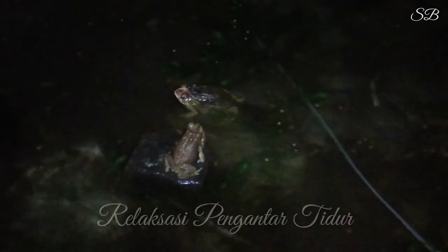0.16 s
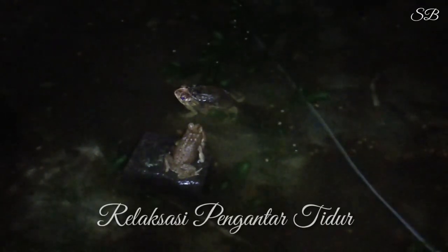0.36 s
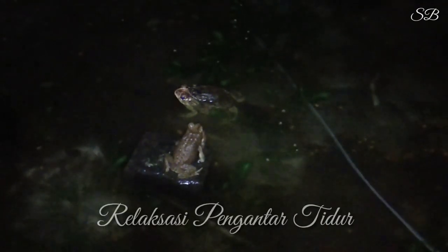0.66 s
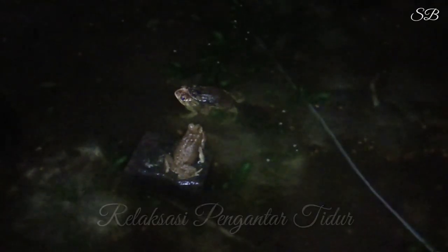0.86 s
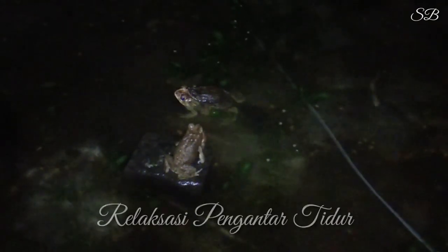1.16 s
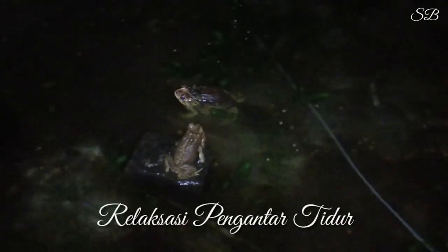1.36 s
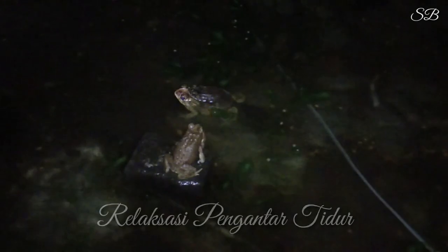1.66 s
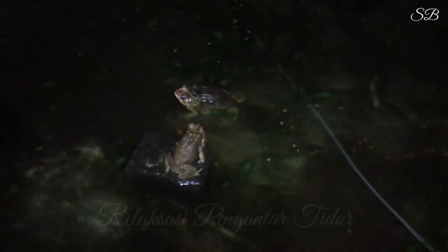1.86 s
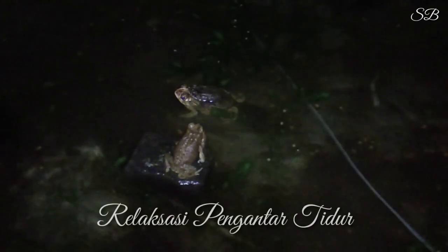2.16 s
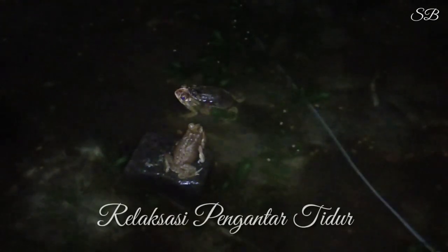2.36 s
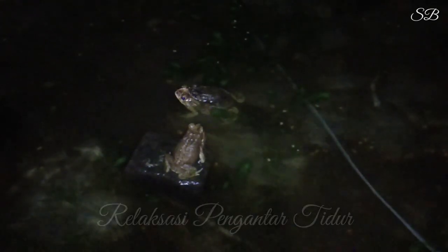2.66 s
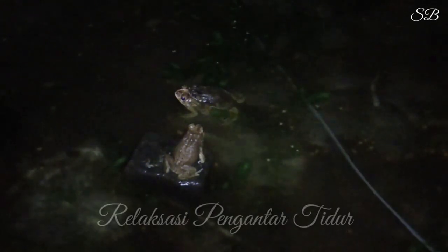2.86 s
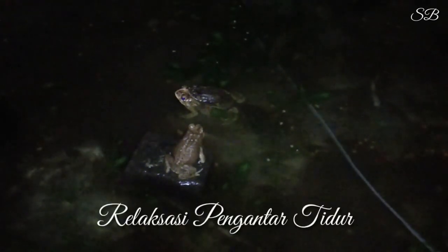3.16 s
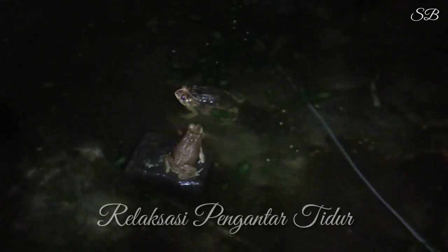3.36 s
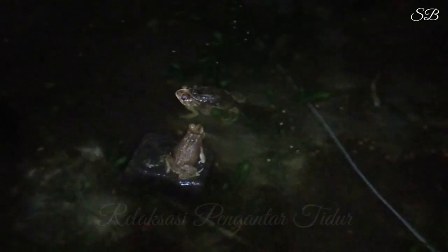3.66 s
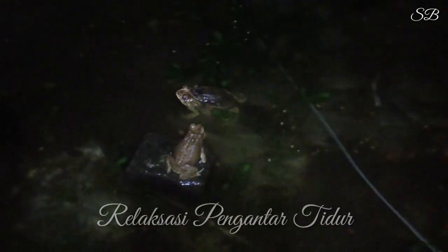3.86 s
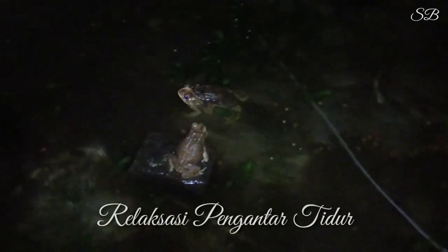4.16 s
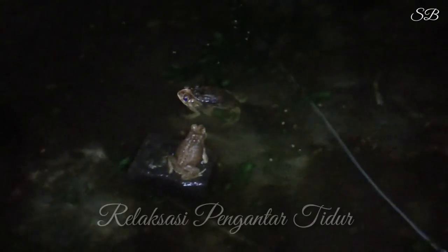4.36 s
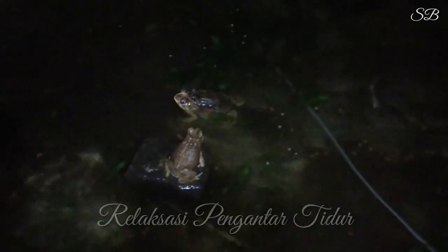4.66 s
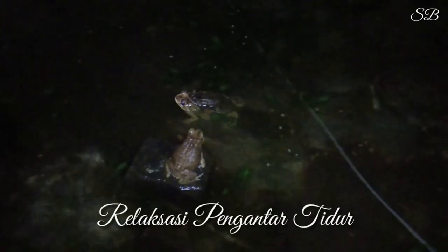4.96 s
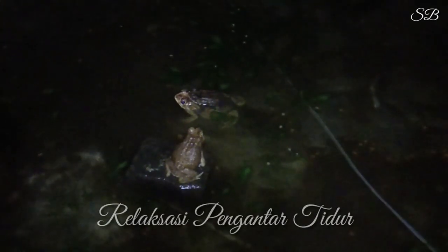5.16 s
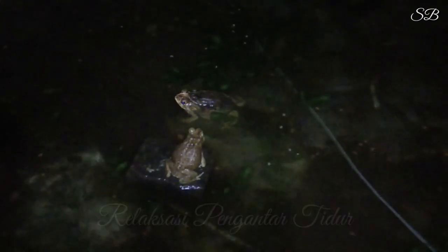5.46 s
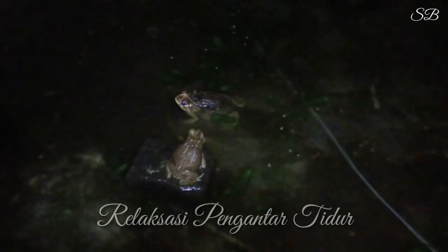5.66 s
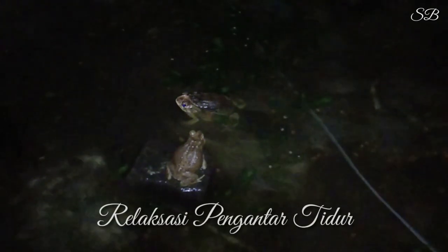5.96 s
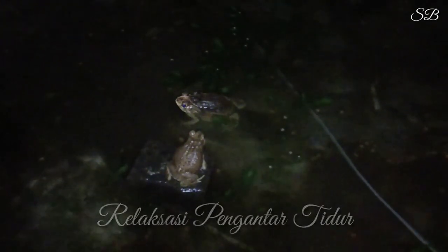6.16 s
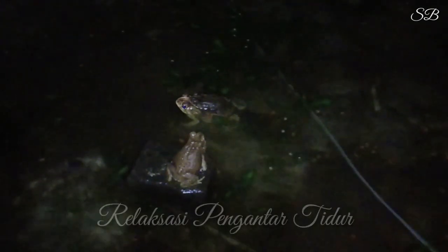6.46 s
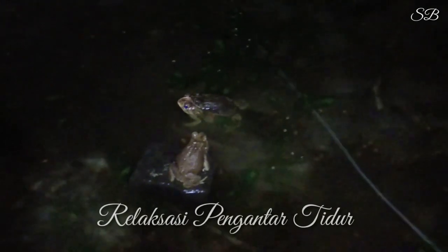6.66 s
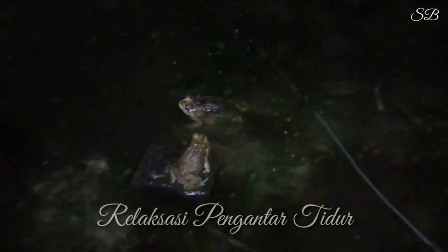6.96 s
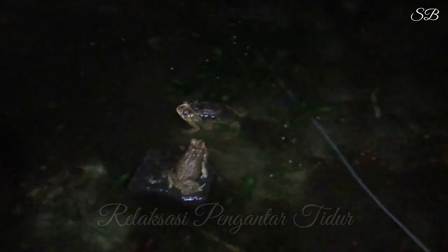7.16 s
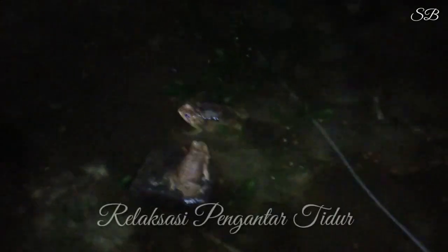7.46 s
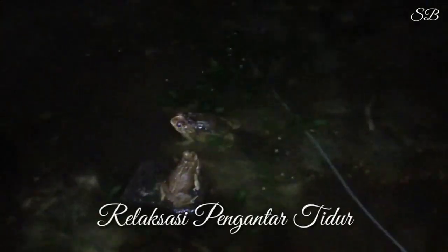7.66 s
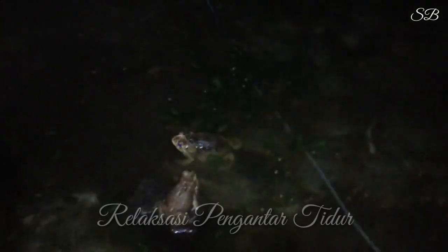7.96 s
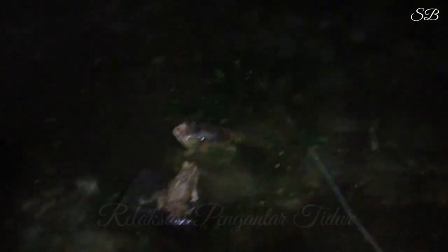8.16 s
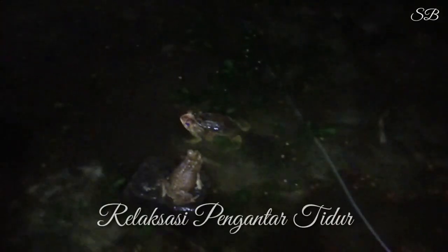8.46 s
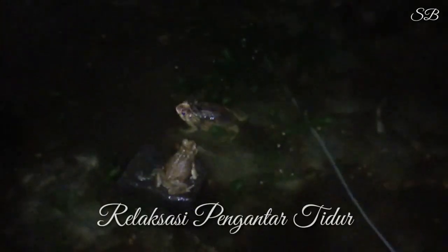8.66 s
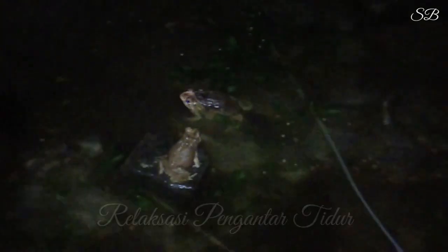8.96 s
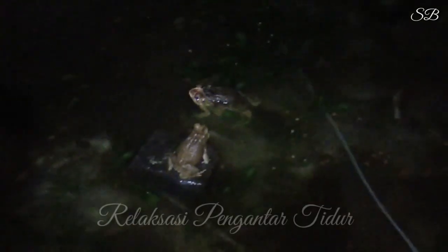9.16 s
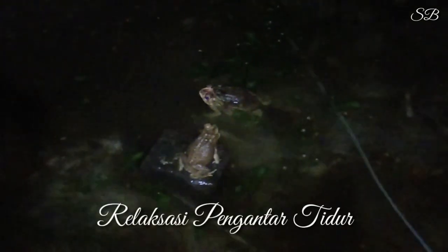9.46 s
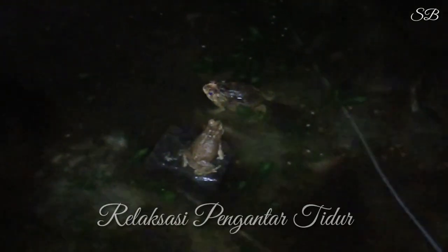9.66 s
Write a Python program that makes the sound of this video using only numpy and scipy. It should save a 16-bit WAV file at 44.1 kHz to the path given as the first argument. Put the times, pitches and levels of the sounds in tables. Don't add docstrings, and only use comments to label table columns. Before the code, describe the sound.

Night pond: sharp, ratcheting toad croaks up close, then a softer distant trilling toad, a low steady croaker, and the near one rejoining before the calls thin out.

```python
import sys
import numpy as np
from scipy import signal
from scipy.fft import rfft, irfft, next_fast_len
from scipy.io import wavfile
from scipy.ndimage import uniform_filter1d, minimum_filter1d, map_coordinates

SR = 44100
rng = np.random.default_rng(int(sys.argv[2]) if len(sys.argv) > 2 else 0)


def convert_level_to_amplitude(level_db):
    exponent = np.asarray(level_db, float) / 20
    return 10 ** exponent


def store_wav(level_fs):
    pcm = np.round(np.clip(np.atleast_2d(level_fs), -1, 1) * 32767)
    wavfile.write(sys.argv[1], SR, pcm.T.astype(np.int16))


N = 432180


def unit(x):
    return x / np.sqrt(np.mean(x ** 2) + 1e-20)


def along(points, hz):
    f, v = np.transpose(points)
    return np.interp(np.log(hz + 1), np.log(f + 1), v)


def curves(rows):
    s, *cols = np.transpose(rows)
    return [np.interp(np.arange(N) / SR, s, c) for c in cols]


def wobble(rate):
    knots = rng.standard_normal(int(N * rate / SR) + 4)
    return map_coordinates(knots, [np.arange(N) * rate / SR])


def filtered(x, response):
    m = next_fast_len(N + SR // 2)
    return irfft(rfft(x, m) * response(np.fft.rfftfreq(m, 1 / SR)), m)[..., :N]


def placed(times, shapes):
    first = np.round(np.asarray(times) * SR).astype(int)[:, None]
    at = first + np.arange(shapes.shape[1])
    return np.bincount(at[at >= 0], shapes[at >= 0], N + SR)[:N]


def band(hz, width_hz):
    return unit(filtered(rng.standard_normal(N), lambda f: np.exp(-np.abs((f - hz) / width_hz) ** 3.0)))


def echoes(x, level_db):
    # frequency in Hz, t60 in seconds.
    banks = [(500, 0.19), (1600, 0.34), (4000, 0.054)]
    wet, step = np.zeros(N + SR), SR // 3
    for start in range(0, N, step):
        hz, t, z = signal.stft(rng.standard_normal(SR // 2), SR, nperseg=256)
        tail = signal.istft(z * convert_level_to_amplitude(-60 * t / along(banks, hz)[:, None]), SR, nperseg=256)[1]
        answer = signal.fftconvolve(x[start:start + step], tail / np.linalg.norm(tail))
        wet[start:start + len(answer)] += answer
    return x + convert_level_to_amplitude(level_db) * wet[:N]


def toad(pulses, sac_hz, body, closes, sag, spread, rise, t60, octave_db, locked, effort=0, closing_db=0):
    s, db = np.transpose(pulses)
    t = np.arange(SR // 20) / SR
    luck = rng.standard_normal((len(s), len(body) + 2))
    to_close = np.min(np.abs(s[:, None] - np.array(closes)), axis=1)
    weakness_db = (db - np.max(db))[:, None]

    hz = sac_hz * (1 - sag * np.exp(-(to_close / 0.015) ** 2) + spread * luck[:, 0])[:, None]
    hz *= 1 + effort * weakness_db
    bright_db = closing_db * np.exp(-(to_close / 0.08) ** 2)[:, None]
    bright_db += 140 * effort * weakness_db

    drift = np.cumsum(np.minimum(1.1 * np.diff(s, prepend=0) / .01, 3) * luck[:, 1])
    in_step = locked * (2 * np.pi * sac_hz * s + .4 * drift)[:, None]
    taut = 0.053 * 0.0022 * (1 - np.exp(-t / 0.0016))
    phase = 2 * np.pi * hz * (t + taut) + in_step

    decay_s = t60 * np.exp(.15 * luck[:, 1:2])
    swell = (1 - np.exp(-(t / rise) ** 2)) * convert_level_to_amplitude(-60 * t / decay_s)
    to_next = np.diff(s, append=s[-1] + 1)[:, None]
    swell *= np.exp(-(np.maximum(t - to_next + 1.3 * rise, 0) / rise) ** 2)
    ring = swell * np.sin(phase) + convert_level_to_amplitude(octave_db) * swell ** 2 * np.sin(2 * phase)

    t = t[:SR // 36]
    for k, (mode_hz, width_hz, mode_db) in enumerate(body):
        snap = (1 - np.exp(-(t / (0.8 * rise)) ** 2)) * np.exp(-np.pi * width_hz * t)
        level = convert_level_to_amplitude(mode_db + bright_db + 2 * luck[:, k + 2:k + 3])
        struck_hz = mode_hz * (1 + .025 * luck[:, k:k + 1])
        ring[:, :len(t)] += level * snap * np.sin(2 * np.pi * struck_hz * t + .5 * luck[:, k + 1:k + 2])
    return placed(s, convert_level_to_amplitude(db)[:, None] * ring)


def whistles(rows, top_hz, length, third_db, fourth_db, first_db=-80):
    s, db, fall = np.transpose(rows)[:, :, None]
    t = np.arange(SR // 10) / SR - 1 / 20
    u = t / (length * (1 + fall / 22))
    bend = .5 + .5 * np.tanh(1.7 * u - .4 - fall / 40)
    hz = top_hz * (1 - fall / 100 * bend - fall / 500)
    phase = 2 * np.pi * np.cumsum(hz, axis=1) / SR
    tone = convert_level_to_amplitude(first_db - .6 * fall) * np.sin(phase) + np.sin(2 * phase)
    tone += convert_level_to_amplitude(third_db) * np.sin(3 * phase) + convert_level_to_amplitude(fourth_db) * np.sin(4 * phase)
    return placed(s[:, 0] - 1 / 20, convert_level_to_amplitude(db + 4) * np.exp(-u ** 2) * tone)


def rattle(start, roll, close, db, opening, gap, weak_db=0, after_db=0):
    # delay in seconds, level in dB.
    after_snaps = [
        (.0012, -13),
        (0.0097, -9.5),
    ]
    knock_gap_s, crowded_s, roll_stops_s = .0142, .0122, .005
    choke_db, roll_fade_db, uneven_db = 5.5, 1.5, 0.9
    luck = rng.standard_normal((3, 12))
    opened = start + opening[-1][0]
    pulses = [(start + s, d) for s, d in opening if start + s < roll - .004]

    knocks = roll - knock_gap_s * np.arange(5, 0, -1) + .0006 * luck[0, :5]
    knocks = [s for s in knocks if s > opened + .007]
    if knocks and knocks[0] - opened < crowded_s:
        pulses[-1] = (opened, opening[-1][1] - choke_db)
    pulses += [(s, -0.04 - weak_db * (k == 0)) for k, s in enumerate(knocks)]

    rolled = roll + np.cumsum(np.append(0, gap * np.exp(.1 * luck[1, 1:])))
    for s, u in zip(rolled, luck[2]):
        if s < close - roll_stops_s:
            pulses.append((s, uneven_db * u - roll_fade_db * (s - roll) / (close - roll)))
    for (s, d), u in zip(after_snaps, luck[0, 6:]):
        pulses.append((close + s + .0015 * u, d + u + after_db))
    return [(s, db + d) for s, d in pulses]


def near_calls():
    # time in seconds, peak in dB.
    leftover = [
        (-.0022, -11),
        (.0048, -13),
        (.0135, -16),
    ]
    # start, roll and close in seconds, level in dB, weakening of the first knock in dB.
    bout_calls = [(.0614, .1326, .1634, -3, 0), (.2282, .2950, .3283, -4, 5), (.3868, .4428, .4721, -3, 0),
                  (.5370, .6056, .6380, -3, 16), (.7002, .7695, .8009, -3, 3), (.8653, .9194, .9495, -3, 1),
                  (1.0156, 1.0851, 1.1143, -3, 7), (1.1789, 1.2487, 1.2804, -3, 18),
                  (1.3512, 1.4216, 1.4530, -3, 2), (1.5190, 1.6060, 1.6339, -3, 2),
                  (1.7262, 1.8008, 1.8422, -3, 7), (1.9041, 1.9572, 1.9896, -3, 2),
                  (2.0559, 2.1138, 2.1454, -3, 1), (2.2117, 2.2856, 2.3154, -3, 3),
                  (2.3812, 2.4360, 2.4685, -3, 2), (2.5369, 2.6120, 2.6575, -3, 10)]
    # start, roll and close in seconds, level in dB, fall of the closing whistle in %.
    return_calls = [(6.6738, 6.6837, 6.695, -13, 15), (6.7962, 6.8030, 6.822, -14, 14),
                    (6.9158, 6.9214, 6.940, -13, 18), (6.9709, 6.9875, 7.0027, -9.5, 6),
                    (7.0851, 7.0943, 7.115, -9.5, 13), (7.1957, 7.2175, 7.2503, -8, 6),
                    (7.3267, 7.3360, 7.352, -11, 13), (7.4254, 7.4679, 7.4999, -6, 6),
                    (7.5644, 7.5898, 7.6227, -4.3, 6), (7.6900, 7.7307, 7.7611, -6, 6),
                    (7.8314, 7.8578, 7.8935, -6, 6)]
    # delay in seconds, level in dB.
    full_opening = [
        (0, -2),
        (.0067, .5),
        (.0140, -.5),
    ]
    # delay in seconds, level in dB.
    return_opening = [
        (0, -2.5),
        (.0098, -2),
    ]
    whistle_db, whistle_grows = -28.5, 0.53
    full_fall = 6
    pulses, glides = list(leftover), []
    for start, roll, close, db, weak_db in bout_calls:
        pulses += rattle(start, roll, close, db, full_opening, .0060, weak_db)
        glides.append((close, whistle_db + whistle_grows * db, full_fall))
    for start, roll, close, db, fall in return_calls:
        pulses += rattle(start, roll, close, db, return_opening, .0072, after_db=-3)
        glides.append((close, whistle_db + whistle_grows * db - (fall - full_fall) / 5, fall))
    return sorted(pulses), glides


def near_toad():
    # frequency in Hz, width in Hz, level in dB.
    near_body = [(300, 80, -43.5), (742, 113, -28.5), (827, 90, -36), (1040, 330, -23), (1805, 71, -13),
                 (2001, 110, -19), (3066, 200, -22.5), (3336, 218, -19.5), (3600, 140, -26.5),
                 (3925, 200, -33), (5230, 220, -45), (7220, 110, -59)]
    # centre in seconds, overtone level in dB, fall in %.
    warm_up = [
        (6.44, -42, 5),
        (6.57, -41, 7),
    ]
    pulses, glides = near_calls()
    closes = [row[0] for row in glides]
    voice = convert_level_to_amplitude(3.0) * toad(pulses, 1624.5, near_body, closes, sag=0.024, spread=.008, rise=.0011, t60=0.035,
                            octave_db=-28, locked=False, effort=.003, closing_db=4)

    def low_gaps(hz):
        return 1 - 0.74 * np.exp(-((hz - 430) / 90) ** 2) - .5 * np.exp(-((hz - 1300) / 160) ** 2)

    def small_body(hz):
        return (1 - .5 * np.exp(-((hz - 2600) / 250) ** 2)) * hz ** 4 / (hz ** 4 + 220 ** 4)

    voice = filtered(filtered(voice, low_gaps), small_body)
    voice += convert_level_to_amplitude(-1.5) * whistles(glides, 1565, length=.0065, third_db=-17, fourth_db=-30, first_db=21)
    voice += whistles(warm_up, 1475, length=.011, third_db=-10, fourth_db=-30, first_db=14)
    strain = [(s - .018, db - 30.0, 2.5) for s, db, fall in glides if fall < 8]
    voice += whistles(strain, 3410, length=0.016, third_db=-56.5, fourth_db=-60)
    return echoes(voice, level_db=-15.5)


def chorus():
    # time in seconds, then low crickets, high crickets and katydids in dB.
    insects = [(0.0, -47, -58, -63), (2.26, -47.5, -52.5, -66), (3.16, -51, -53.5, -66.5),
               (3.77, -50, -57.5, -67.5), (4.12, -48.5, -55, -66), (7.69, -48, -54, -67),
               (8.22, -52.5, -58, -65), (9.11, -50, -54, -66), (9.8, -51, -56, -66)]
    # time in seconds, level in dB.
    crowd_toads = [(0, -44), (2.6, -44), (2.8, -42), (3.5, -43), (3.7, -53), (6.3, -53), (7.0, -46),
                   (7.9, -52), (8.1, -55), (9.05, -55), (9.15, -57), (9.42, -57), (9.58, -72), (9.8, -78)]
    # time in seconds, level in dB.
    higher_toads = [(0, -48), (2.6, -49), (2.75, -47), (3.55, -41), (3.7, -60), (9.8, -79)]
    # time in seconds, level in dB.
    mutter = [(0, -65.5), (2.7, -57.5), (6.5, -55.5), (7.2, -50), (9.0, -61.5), (9.3, -67), (9.8, -74)]
    # time in seconds, level in dB.
    late_cricket = [(0, -72), (8.5, -73.5), (8.75, -52), (9.8, -59)]
    # frequency in Hz, density in dB per Hz.
    night = [(21, -61.5), (35, -27), (52, -12), (119, -7.5), (178, -11.5), (249, -13), (402, -19.5),
             (534, -24), (2120, -33.5), (2400, -19.5), (3120, -51), (5280, -120)]
    low_db, high_db, katydid_db = curves(insects)
    crowd = convert_level_to_amplitude(curves(crowd_toads)[0] + 2 * wobble(14)) * band(1480, 430)
    crowd += convert_level_to_amplitude(curves(higher_toads)[0] + 4.6 * wobble(21)) * band(1640, 140)
    crowd += convert_level_to_amplitude(curves(mutter)[0] + 1.8 * wobble(12)) * band(825, 300)
    crowd += convert_level_to_amplitude(low_db + 1.0 * wobble(4.1) + 0.72 * wobble(45)) * band(3552, 400)
    crowd += convert_level_to_amplitude(curves(late_cricket)[0] + 0.65 * wobble(22)) * band(3860, 72)
    crowd += convert_level_to_amplitude(high_db + 2.1 * wobble(8.2) + 0.74 * wobble(60)) * band(4738, 430)
    crowd += convert_level_to_amplitude(katydid_db + .9 * wobble(8) + 1.0 * wobble(40)) * band(5983, 260)
    crowd += convert_level_to_amplitude(-66 + 1.5 * wobble(4)) * band(2680, 260)
    crowd += convert_level_to_amplitude(-62.5) * band(4300, 2600)
    air = unit(filtered(rng.standard_normal(N), lambda hz: convert_level_to_amplitude(along(night, hz))))
    return crowd + convert_level_to_amplitude(-60.0 + 0.26 * wobble(1.7)) * air


def croaks(rows, gap, fade_db):
    pulses = []
    for start, crest, end, start_db, crest_db in rows:
        luck = rng.standard_normal((40, 2))
        s = start + np.cumsum(gap * np.exp(0.16 * luck[:, 0])) - gap * np.exp(.18 * luck[0, 0])
        rise = np.clip((s - start) / (crest - start), 0, 1) ** 2
        fade = np.clip((s - crest) / (end - crest), 0, 1)
        db = start_db + (crest_db - start_db) * rise - fade_db * fade
        pulses += list(zip(s, db + 1.8 * luck[:, 1]))[:np.sum(s < end)]
    return sorted(pulses)


def trilling_toad():
    # start in seconds, crest in seconds, crest level
    # in dB.
    trill_calls = [(2.725, 2.77, -24), (2.836, 2.884, -23), (2.938, 3.012, -21), (3.072, 3.118, -24),
                   (3.186, 3.231, -22), (3.295, 3.343, -22), (3.405, 3.449, -20), (3.515, 3.559, -19),
                   (3.622, 3.662, -22),
                   (3.729, 3.785, -20), (3.849, 3.902, -21), (3.956, 4.032, -20), (4.089, 4.142, -21),
                  (4.216, 4.26, -19), (4.322, 4.375, -18), (4.44, 4.508, -20), (4.562, 4.632, -18),
                  (4.698, 4.753, -22), (4.806, 4.874, -19), (4.948, 5.037, -17), (5.102, 5.179, -20),
                  (5.258, 5.332, -20), (5.389, 5.453, -20), (5.514, 5.595, -21), (5.689, 5.75, -18),
                  (5.815, 5.896, -20), (5.95, 6.029, -18), (6.097, 6.175, -19), (6.24, 6.32, -20),
                  (6.394, 6.454, -17), (6.526, 6.562, -17), (6.705, 6.74, -20), (6.83, 6.88, -20),
                  (7.03, 7.043, -18), (7.125, 7.135, -20), (7.36, 7.382, -19), (8.675, 8.71, -46)]
    # frequency in Hz, width in Hz, level in dB.
    far_body = [(809, 49.5, -17.5), (1713, 83, -2), (1867, 89, -0.5), (2082, 40, -13)]
    start_db, lead_db, release_s = -23.5, 4, .025
    calls = trill_calls
    rows = [(s, crest, crest + release_s, min(start_db, db - lead_db), db) for s, crest, db in calls]
    crests = [crest for _, crest, _ in calls]
    voice = toad(croaks(rows, gap=0.0087, fade_db=9.5), 1465, far_body, crests, sag=0.012, spread=0.012,
                 rise=.0019, t60=0.075, octave_db=-28.5, locked=True, closing_db=-7)
    glides = [(crest, db - 39, 1.5) for _, crest, db in calls]
    whistle = whistles(glides, 1450, length=.011, third_db=-13, fourth_db=-30, first_db=32)
    return convert_level_to_amplitude(1.5) * voice + whistle


def low_toad():
    # time in seconds, count of croaks so far, peak level in dB.
    beat = [(2.97, 0, -43), (3.979, 8, -40), (4.594, 13, -39), (4.974, 16, -40), (5.613, 21, -38),
            (5.988, 24, -36), (6.364, 27, -38), (6.882, 31, -37), (7.427, 35, -34), (7.840, 38, -35),
            (7.995, 39, -36.5), (8.1434, 40, -36), (8.558, 43, -36), (8.967, 46, -36.5)]
    # frequency in Hz, width in Hz, level in dB.
    low_body = [(760, 110, -9), (1330, 130, -8), (1720, 130, -3)]
    at, done, level_db = np.transpose(beat)
    starts = np.interp(np.arange(done[-1] + 1), done, at)
    lengths = np.interp(starts, [4, 6, 8], [.03, .04, .07])
    levels = np.interp(starts, at, level_db)
    rows = [(s, s + .006, s + length, db + 4, db + 3) for s, length, db in zip(starts, lengths, levels)]
    return toad(croaks(rows, gap=.0115, fade_db=8), 1092, low_body, [0], sag=.01, spread=.011,
                rise=.0018, t60=.05, octave_db=-36, locked=True)


def hoots():
    # start in seconds, length in seconds, pitch in Hz, level in dB.
    notes_far_off = [
        (7.65, 0.12, 152, -57),
        (8.153, 0.39, 156, -59.5),
        (8.087, 0.21, 300, -60.5),
        (8.46, 0.14, 467, -49.5),
        (8.577, 0.085, 470, -57),
        (8.873, 0.054, 476, -57),
        (8.958, 0.051, 493, -54),
    ]
    t = np.arange(N) / SR
    mix = np.zeros(N)
    for s, length, hz, db in notes_far_off:
        swell = np.sin(np.pi * np.clip((t - s) / length, 0, 1))
        mix += convert_level_to_amplitude(db) * swell * np.sin(2 * np.pi * hz * t)
    return mix


def scene():
    farther = echoes(trilling_toad() + low_toad(), level_db=-16)
    return (near_toad() + chorus() + farther + hoots())[None]


def low_pass(x):
    return signal.sosfilt(signal.butter(12, 7520, fs=SR, output="sos"), x)


def record(dry):
    size = np.abs(signal.hilbert(dry, next_fast_len(N)))[:, :N]
    crest = uniform_filter1d(-minimum_filter1d(-size, size=30), size=30)
    held = dry / (1 + (crest / .84) ** 12) ** (1 / 12)
    narrow = filtered(held, lambda hz: (1 + (hz / 7200) ** 40) ** -.5 * hz ** 2 / (hz ** 2 + 30 ** 2))
    hiss = (convert_level_to_amplitude(-95.0) + convert_level_to_amplitude(-66.5) * size) * rng.standard_normal(dry.shape)
    return low_pass(narrow + hiss)


dry = scene()
out = record(dry)
store_wav(out)
```